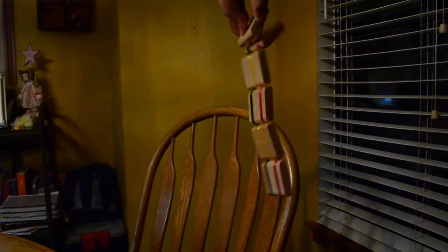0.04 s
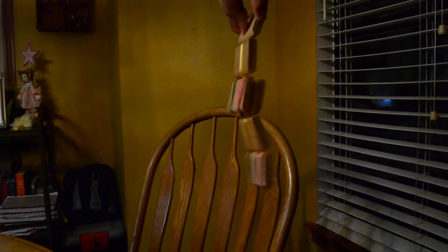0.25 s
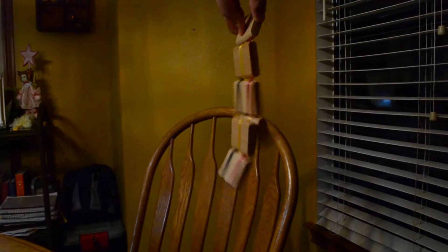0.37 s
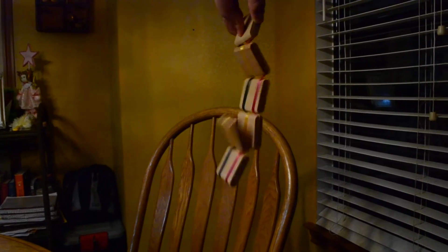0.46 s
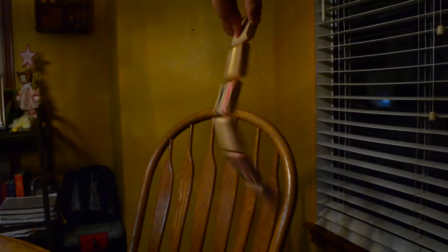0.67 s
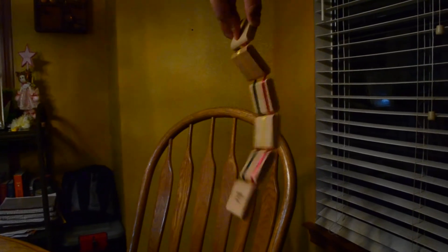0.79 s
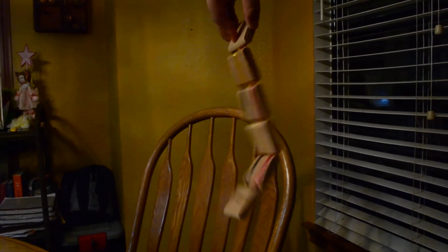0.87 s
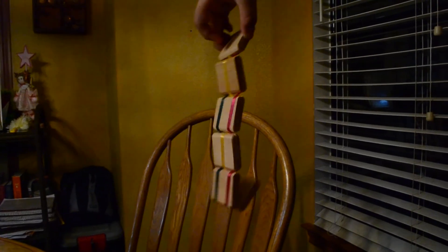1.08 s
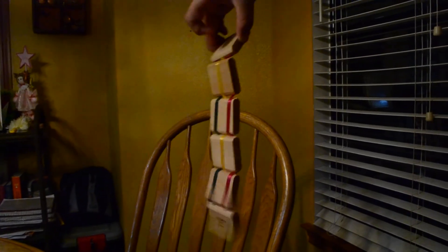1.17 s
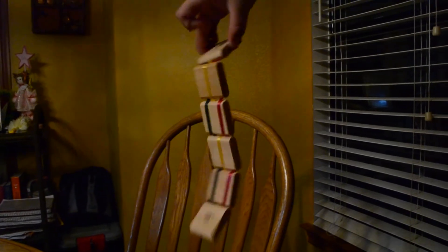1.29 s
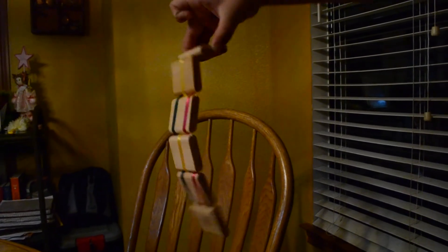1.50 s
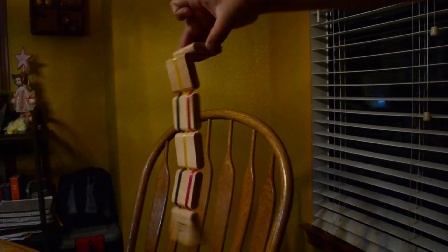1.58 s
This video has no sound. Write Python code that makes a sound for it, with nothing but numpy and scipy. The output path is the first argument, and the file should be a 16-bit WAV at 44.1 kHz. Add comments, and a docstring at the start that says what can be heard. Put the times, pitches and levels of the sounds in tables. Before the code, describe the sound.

Wooden toy blocks on ribbons flip and clack together three times in quick succession, each knock ringing briefly in a small, quiet room. Afterwards, a faint tick and two barely audible ribbon rubs sit in soft hiss.

```python
"""Tumbling toy blocks

A chain of ribbon-linked wooden blocks hangs from a hand in a small, quiet room. The blocks flip over
and clack together three times, with two fainter ticks and two soft ribbon rubs. Each contact rings
the wood for a few milliseconds; near walls throw it back and the room rings on over a faint hiss."""
import sys
import numpy as np
from scipy import signal
from scipy.fft import rfft, irfft, next_fast_len
from scipy.io import wavfile

SR = 44100
rng = np.random.default_rng(int(sys.argv[2]) if len(sys.argv) > 2 else 0)


def inscribe(sig):
    """Save sig as 16-bit PCM at rate SR to the path in sys.argv[1].

    A 1-D sig is mono; a 2-D sig holds one channel per row.
    Samples are clipped to [-1, 1] before scaling.
    """
    pcm = np.round(np.clip(np.atleast_2d(sig).T, -1, 1) * 32767)
    wavfile.write(sys.argv[1], SR, pcm.astype(np.int16))


N = 72765


def undb(db):
    """Decibels to gain."""
    return 10 ** (np.asarray(db) / 20)


def unit(x):
    """Scale to an energy of one."""
    return x / np.sqrt(np.sum(x ** 2))


def along(hz, points):
    """Read (Hz, value) points on a log-frequency axis."""
    f, v = np.array(points, float).T
    return np.interp(np.log(np.maximum(hz, 1)), np.log(f), v)


def shape(x, response):
    """Filter by a response given as a function of frequency."""
    size = next_fast_len(len(x) + SR // 10, real=True)
    return irfft(rfft(x, size) * response(np.fft.rfftfreq(size, 1 / SR)), size)[:len(x)]


def resonance(f, hz, width_hz):
    """Band-pass response with gain one at its centre."""
    return 1j * f * width_hz / (hz ** 2 - f ** 2 + 1j * f * width_hz)


def delay(x, s):
    """Start a sound s seconds later."""
    return np.concatenate([np.zeros(int(max(s, 0) * SR)), x])[:len(x)]


def minimum_phase(gain):
    """The tightest impulse with this gain at each frequency."""
    cepstrum = irfft(np.log(gain + 1e-6))
    half = len(cepstrum) // 2
    fold = np.concatenate([[1], np.full(half - 1, 2), [1], np.zeros(half - 1)])
    return irfft(np.exp(rfft(cepstrum * fold)))


def coloured_noise(response):
    """Steady filtered noise at an RMS of one."""
    return np.sqrt(N) * unit(shape(rng.standard_normal(N), response))


def hiss():
    """A soft, steady bed of hiss with a few narrow bands standing out."""
    # The bed's tone. Each row: frequency in Hz, relative level in dB.
    spectrum = [(15, -57.5), (25, -25), (50, -15.5), (96, -17.5), (182, -11), (319, -5), (353, -5),
                (433, -2), (573, -5), (685, -4.5), (2160, -12), (2930, -11.5), (3320, -16), (6120, -24.5),
                (11000, -39), (14300, -77.5), (22000, -120)]
    # The narrow bands. Each row: centre in Hz, filter width in Hz, level in dB.
    peaks = [(177, 47, -78), (2325, 45, -72.5), (2893, 250, -73), (3644, 80, -82), (6150, 220, -85.5)]
    bed = undb(-62) * coloured_noise(lambda f: undb(along(f, spectrum)))
    for hz, width_hz, db in peaks:
        bed += undb(db) * coloured_noise(lambda f: resonance(f, hz, width_hz) ** 2)
    return bed


def block_clack(colour_db, ring_factor):
    """One contact: short wooden modes and a brief crack; blocks pressed together ring shorter."""
    # The wood's modes. Each row: pitch in Hz, base ring time (t60) in seconds, relative level in dB.
    modes = [(880, 0.013, -26), (1300, 0.029, -30), (1652, .024, -27.5), (2126, 0.018, -19.5),
             (2503, 0.023, -20.5), (2997, 0.01, -13), (3685, 0.0071, -6), (4328, 0.0092, -2.5),
             (4810, 0.0046, -3), (6000, 0.0071, -7), (6660, 0.015, -11.5), (7250, 0.0069, -5.5),
             (8710, .008, -14.5), (9384, 0.0047, -15)]
    # Where a block is hit decides which of five bands ring. Each entry: band centre in Hz.
    bands_hz = [1500, 4400, 6000, 7200, 9400]
    f = np.fft.rfftfreq(4096, 1 / SR)
    power = 0
    for hz, t60, db in modes:
        decay_s = t60 * ring_factor / np.log(1000)
        mode = undb(db) * decay_s * SR / 2 * resonance(f, hz, width_hz=1 / (np.pi * decay_s))
        power += np.abs(mode) ** 2
    power += undb(-16) ** 2 * power.mean()  # broadband crack of the faces meeting
    power *= f ** 4 / (f ** 4 + 590 ** 4)  # small blocks radiate little below 590 Hz
    colour = undb(along(f, list(zip(bands_hz, colour_db))))
    clack = minimum_phase(np.sqrt(power) * colour)
    clack = np.pad(clack, (0, N - len(clack)))
    # All-pass: the wood holds one band back a moment, so the clack swells over a few cycles.
    return shape(clack, lambda f: 1 - 2 * resonance(f, hz=5040, width_hz=1700))


def room_response():
    """Slightly scattered first reflections, then a diffuse tail dying at its own rate in each band."""
    # Slaps off near surfaces. Each row: delay in seconds, relative level in dB.
    echoes = [(.0068, -8), (.0115, -12), (.0143, -16), (.0172, -16.5)]
    # The room's decay. Each row: band centre in Hz, reverb time (t60) in seconds.
    decays = [(500, 0.083), (1300, 0.5), (2500, 0.52), (4400, 0.47), (6500, 0.52), (9500, 0.43)]
    scatter_s, build_s = 0.00018, 0.001
    t = np.arange(SR // 2) / SR
    early = 0
    for s, db in echoes:
        slap = unit(rng.standard_normal(len(t)) * np.exp(-t / scatter_s))
        early += undb(db) * delay(slap, s)
    noise, tail = rng.standard_normal(len(t)), 0
    centres = [hz for hz, _ in decays]
    for share, (_, t60) in zip(np.eye(len(centres)), decays):
        band = shape(noise, lambda f: along(f, list(zip(centres, share))))
        tail += band * np.exp(-np.log(1000) * t / t60)
    tail *= 1 - np.exp(-t / build_s)
    return early + undb(1.5) * unit(tail)


def tumbling_blocks():
    """Flat faces beam part of each clack at the microphone; each hits the walls from its own place."""
    # Block meeting block. Each row: start in seconds, gain in dB, five band gains in dB from low to
    # high, beamed pitch in Hz, beam boost in dB, room send in dB, ring time factor.
    contacts = [(.2493, -13.5, -5, 0.5, 3.5, -10.5, -6.5, 5560, 7.5, 5, 0.85),
                (0.2555, -9.5, -1, 2.5, -7, -9, -3.5, 3800, 1, -0.5, 0.67),
                (.3222, -29, -8.5, -2.5, 7.5, 1.5, -1.5, 7000, 9.5, -12, 0.33),
                (.4029, -18, 2, -1.5, 0.5, -1, 0, 4525, 1.5, 2, 0.81),
                (.4038, -15, -7.5, 5, -5.5, 5.5, -6.5, 7200, 13.5, -1.5, 0.46),
                (0.5648, -15, 4, -4, 5, -2.5, 2, 5900, 6, 2.5, 1.38),
                (.5668, -23, 4.5, -3.5, 0.5, -3, 11.5, 9400, 7, 4.5, 0.858),
                (1.329, -56.5, -12, -6.5, 0.5, -12, -12, 5000, 9, -8.5, 1.4)]
    out = np.zeros(N)
    for start_s, db, *colour_db, beam_hz, beam_db, send_db, ring_factor in contacts:
        clack = undb(db) * delay(block_clack(colour_db, ring_factor), start_s)
        out += shape(clack, lambda f: 1 + (undb(beam_db) - 1) * resonance(f, beam_hz, width_hz=1400))
        out += undb(send_db) * signal.fftconvolve(clack, room_response())[:N]
    return out


def ribbon_rubs():
    """Ribbons brush the wood, faintly and briefly, as the chain swings."""
    # The rubs. Each row: midpoint in seconds, length in seconds, level at the crest in dB.
    rubs = [(1.228, 0.025, -68.5), (1.65, 0.031, -65.5)]
    t = np.arange(N) / SR
    friction = coloured_noise(lambda f: resonance(f, hz=2850, width_hz=1040) ** 2)
    swells = sum(undb(db) * np.exp(-2 * ((t - mid_s) / length_s) ** 2) for mid_s, length_s, db in rubs)
    return friction * swells


def scene():
    """Blocks and ribbons over the hiss, in mono."""
    return (tumbling_blocks() + ribbon_rubs() + hiss())[None]


def record(dry):
    """A small microphone dulls the top, and a steep low-pass cuts it off."""
    # The microphone's tone. Each row: frequency in Hz, gain in dB.
    mic_curve = [(100, 0), (8000, -1.5), (9700, -1.5), (10600, -8.5), (11500, -25.5)]
    cutoff_hz = 11500
    dulled = np.array([shape(x, lambda f: undb(along(f, mic_curve))) for x in dry])
    return signal.sosfilt(signal.ellip(8, .2, 70, cutoff_hz, fs=SR, output="sos"), dulled)


dry = scene()
out = record(dry)
inscribe(out)
```